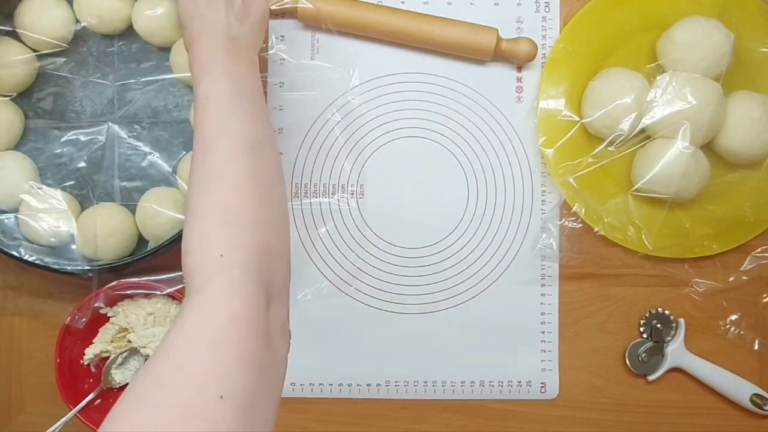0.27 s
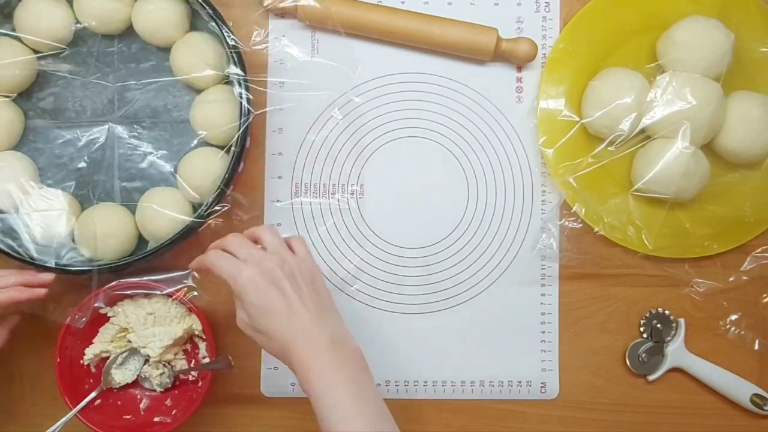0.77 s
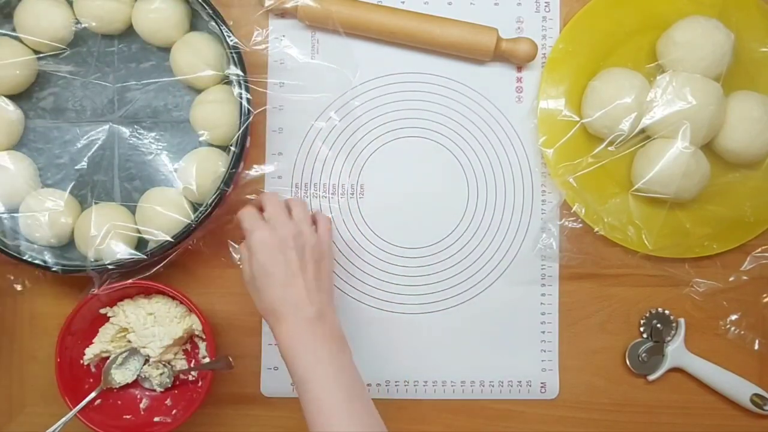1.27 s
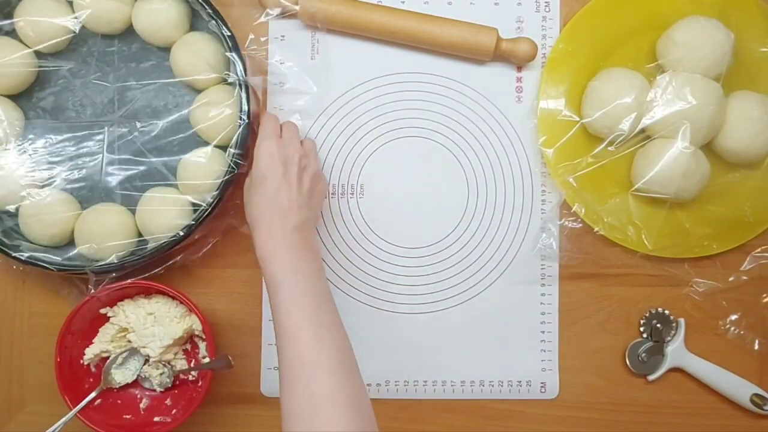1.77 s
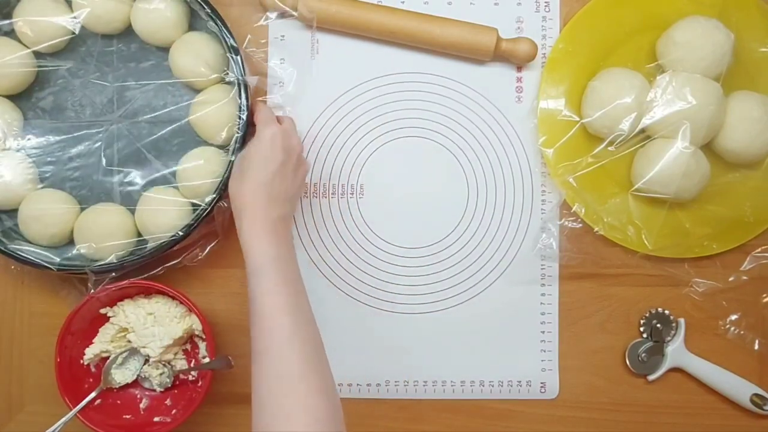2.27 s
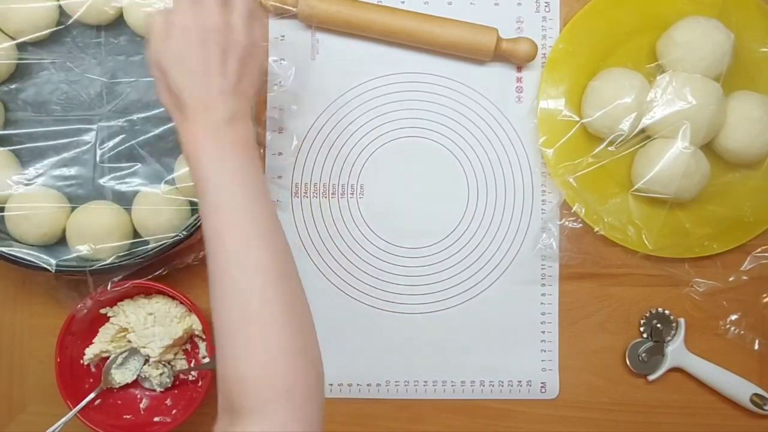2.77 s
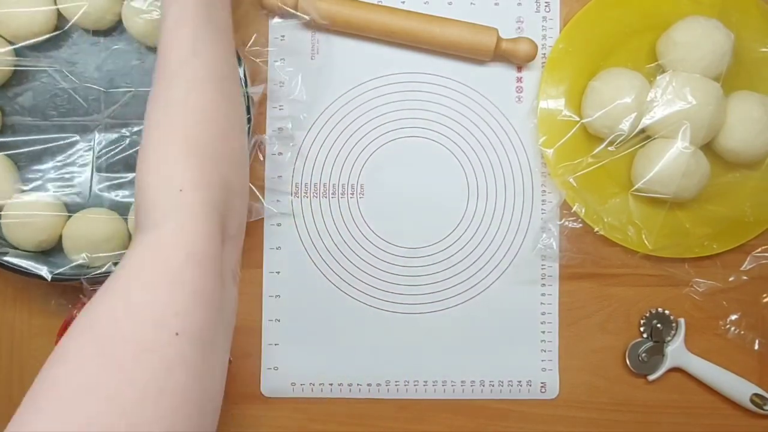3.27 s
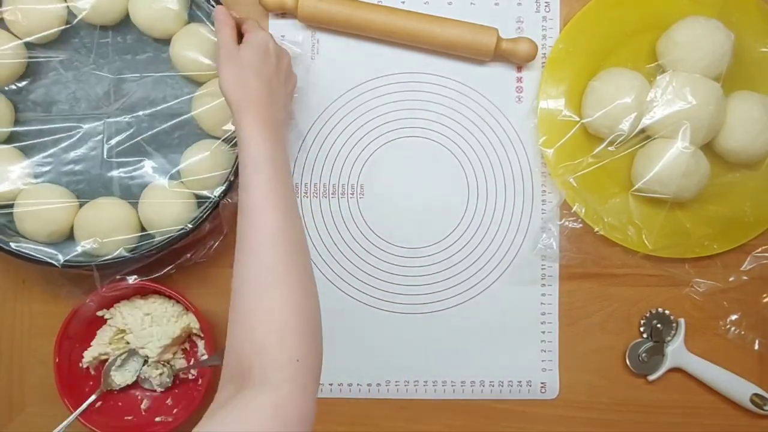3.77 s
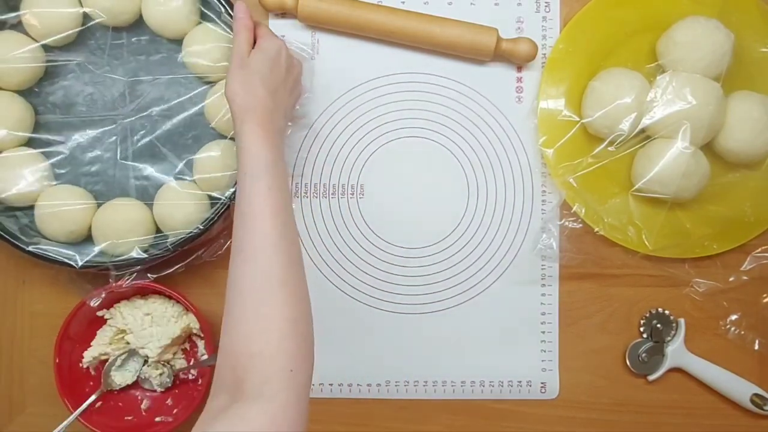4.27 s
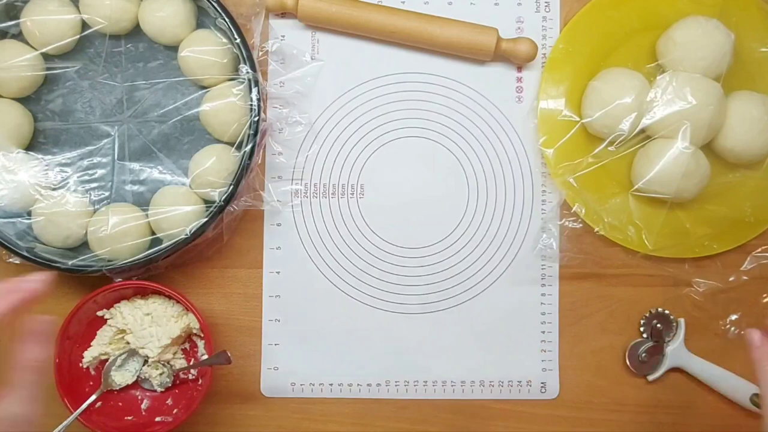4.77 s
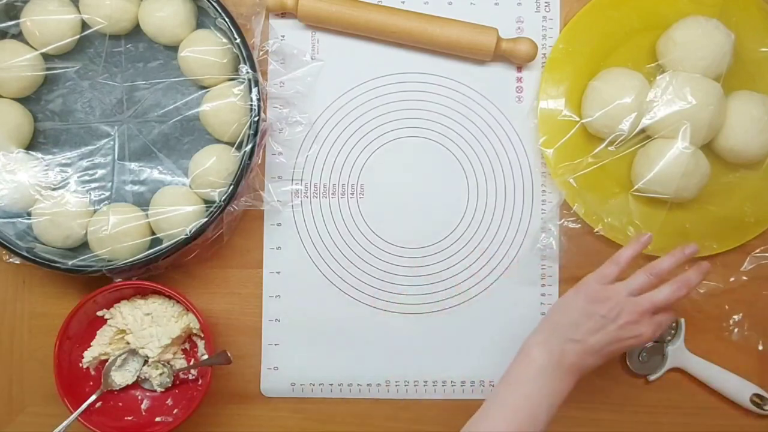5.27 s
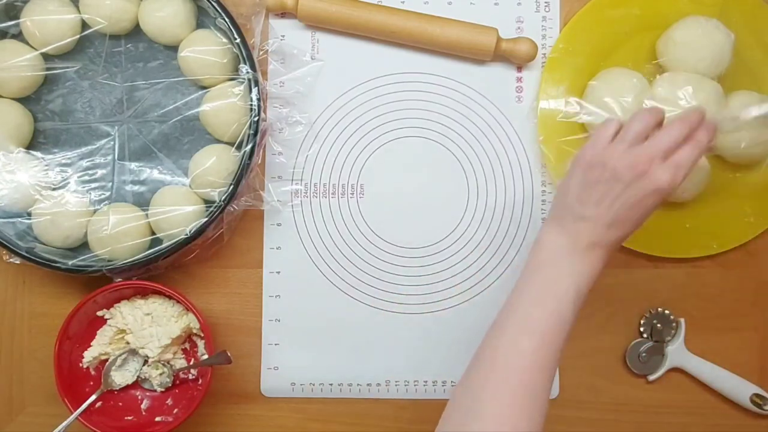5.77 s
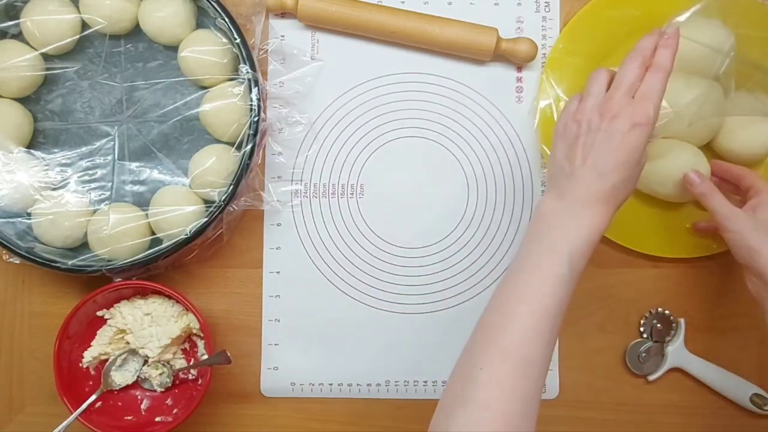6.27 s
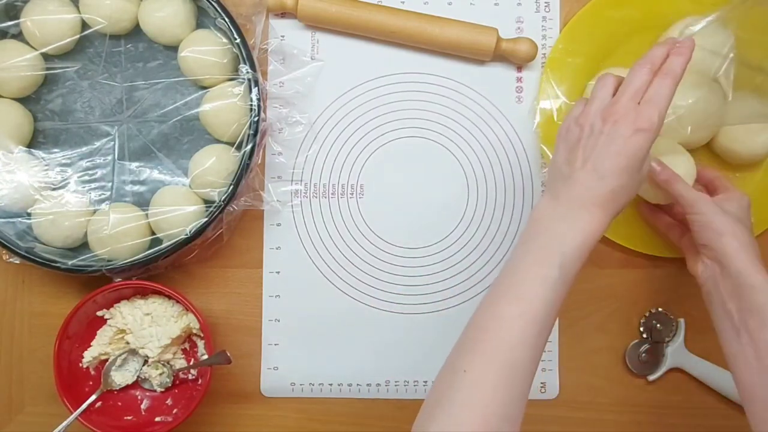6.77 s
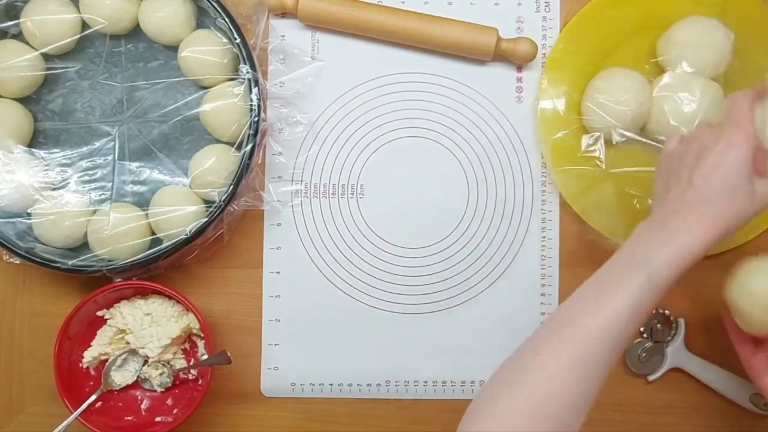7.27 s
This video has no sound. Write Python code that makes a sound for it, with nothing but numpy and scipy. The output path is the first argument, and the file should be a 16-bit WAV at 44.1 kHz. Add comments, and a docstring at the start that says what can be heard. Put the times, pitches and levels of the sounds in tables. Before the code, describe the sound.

Dry, crisp plastic crinkling comes in short bursts close to the microphone, slightly left, with sliding fingers and dull metallic thumps from a pan on a wooden table. The knocks peak midway, then the crackling thins and drops out for an instant. Muffled bumps sound farther off. A second, lighter bout of crackling follows toward the right, fading to quiet handling of soft dough and a final snap of film. Short kitchen reverberation, faint hiss.

```python
"""Cling film over a baking pan and a bowl

Cling film is pulled and pressed over a metal pan on a kitchen table, then lifted off dough on the right.
Buckling creases give showers of clicks; stick-slip rubbing drives a taut film and the pan or bowl below.
Knocks ring the modes of pan and table, dough lands in soft thuds and fingers squeak as narrow-band noise.
Far bumps arrive as decaying room noise over faint steady rumble and hiss; early scatter and a diffuse
tail follow the film.
"""
import sys
import numpy as np
from scipy import signal
from scipy.fft import rfft, irfft, next_fast_len
from scipy.io import wavfile
from scipy.ndimage import map_coordinates

SR = 44100
rng = np.random.default_rng(int(sys.argv[2]) if len(sys.argv) > 2 else 0)


def master(y):
    """Save y as 16-bit WAV."""
    cut = np.clip(np.atleast_2d(y).T, -1, 1)
    pcm = np.round(cut * 32767)  # scale
    wavfile.write(sys.argv[1], SR, pcm.astype(np.int16))


N = 332514  # length [samples]
BOWL_FROM_S = 5  # the hands work at the pan before this time, at the bowl after it


# Tugs at the film: (start [s], rise [s], hold [s], relative crinkle level [dB],
# slack folds relative to the crinkle [dB])
TUG_ROWS = [(0.053, .075, 0.08, -44, -17), (0.24, .025, 0.017, -45.5, -13), (0.312, .06, 0.099, -52, -19),
            (0.621, 0.013, 0.072, -55, -24), (1.054, .012, 0.087, -55, -10.5),
            (1.135, 0.046, 0.0095, -47, -14), (1.242, .01, 0.053, -47, -14), (1.311, 0.055, 0.14, -52, -11),
            (1.443, .01, 0.016, -49, -2), (1.694, 0.067, .05, -55, -5), (1.795, .05, .02, -45, -4),
            (1.879, .03, 0.095, -49, -14), (1.999, 0.049, 0.018, -43, -15), (2.108, 0.035, 0.042, -47, -15),
            (2.21, .04, 0.085, -51, -15), (2.355, .02, 0.072, -50, -7), (2.451, 0.075, 0.15, -53, -11),
            (2.659, 0.083, 0.075, -43, -9.5), (2.831, .03, 0.098, -52, -14),
            (3.033, 0.021, 0.041, -57, -9.5), (3.133, .03, .06, -67, -14.5), (3.202, .07, .08, -50, -9),
            (3.354, .015, 0.23, -45.5, -7.5), (3.602, 0.027, 0.24, -53.5, -12),
            (3.776, .06, 0.075, -51, -12), (3.944, .01, 0.027, -44.5, -20.5),
            (4.012, .01, 0.043, -42.5, -14), (4.131, 0.032, 0.23, -56, -13.5),
            (4.408, .012, .07, -58, -15.5), (4.519, .02, .15, -63, -13.5),
            (4.674, 0.019, 0.0098, -58.5, -16), (5.03, .14, 0.19, -69, -13),
            (5.351, 0.022, 0.053, -51, -12), (5.48, 0.0092, 0.012, -49, -12),
            (5.622, .035, .04, -47, -10.5), (5.766, 0.026, 0.094, -48, -8.5),
            (5.881, 0.019, 0.034, -45.5, -11), (5.93, .02, 0.038, -52, -10),
            (5.994, .012, .065, -43.5, -12), (6.117, .008, 0.04, -46.5, -12),
            (6.208, .008, 0.0096, -53.5, -12.5), (6.318, 0.0049, 0.013, -58, -21.5),
            (6.455, .01, 0.45, -68, -24), (7.004, .12, 0.068, -70.5, -21), (7.188, .025, 0.2, -58.5, -17),
            (7.423, 0.0088, 0.063, -56, -13), (7.518, 0.0051, 0.048, -48, -19.5)]
TUG_SAG_DB_PER_S, TUG_RELEASE_DB_PER_S = 16, 250  # the film gives while held, then falls quiet
SETTLE_DB, SETTLE_DB_PER_S = -25, 43  # loosened creases go on settling after each tug
# Single creases snapping over: (time [s], relative peak level [dB])
SNAP_EVENTS = [(0.0623, -41), (0.1421, -29), (0.165, -22), (0.5457, -42), (0.597, -41), (0.6185, -32),
               (0.6504, -37), (0.7098, -41), (0.9931, -56), (1.0605, -41), (1.1523, -31), (1.1792, -29),
               (1.2481, -33), (1.3778, -30), (1.4277, -35), (1.4556, -32), (1.498, -37), (1.6062, -50),
               (1.9634, -27), (2.0524, -30), (2.1535, -32), (2.2024, -32), (2.2747, -30), (2.3191, -33),
               (2.58, -32), (3.2804, -34), (3.3682, -31), (3.4895, -31), (3.7284, -37), (3.9534, -30),
               (4.0203, -33), (4.0637, -30), (4.3116, -33), (4.4754, -42), (4.5346, -42), (4.56, -42),
               (5.3677, -35), (5.4061, -32), (5.4919, -35), (5.6565, -33), (5.8486, -32), (5.9044, -28),
               (5.9164, -28), (6.0122, -27), (6.0444, -30), (6.1215, -31), (6.1958, -38), (6.2148, -34),
               (6.3245, -41), (6.3514, -43), (6.4592, -46), (6.4867, -42), (6.6174, -50), (7.1921, -45),
               (7.3287, -43), (7.43, -39), (7.5218, -28), (7.5304, -33)]
# A snap briefly stirs up the crinkle around it
FLURRY_DB, FLURRY_RISE_S, FLURRY_HOLD_S, FLURRY_DB_PER_S = 5, .001, .004, 700.5
# Spectrum of small creases: (frequency [Hz], relative level [dB])
FILM_SPECTRUM = [(200, -24.5), (700, -14), (1600, -8.5), (2800, -9), (4200, -1), (5500, -2.5), (8400, -3),
                 (11300, 2), (14000, -1.5), (15800, -6.5)]
# Spectrum of wide slack folds: (frequency [Hz], relative level [dB])
FOLD_SPECTRUM = [(300, -6), (1000, -11), (1700, -3), (2800, -2), (4500, -8.5), (9000, -16)]
# Spectrum of single loud snaps: (frequency [Hz], relative level [dB])
SNAP_SPECTRUM = [(500, -22), (2000, -17.5), (4000, -10.5), (7000, -4), (11500, 1), (15800, -5)]


def film():
    """Buckling instability: tugs release showers of creases, peeling sizzle, slack folds and loud snaps."""
    tugs = gestures(TUG_ROWS, TUG_SAG_DB_PER_S, TUG_RELEASE_DB_PER_S, SETTLE_DB, SETTLE_DB_PER_S)
    tug_db, fold_db = np.transpose(TUG_ROWS)[3:]
    snap_s, peak_db = np.transpose(SNAP_EVENTS)
    flurry_rows = [(start, FLURRY_RISE_S, FLURRY_HOLD_S) for start in snap_s]
    flurries = gestures(flurry_rows, 0, FLURRY_DB_PER_S)
    level_db = summed_db(tugs, tug_db) + FLURRY_DB * per_sample(flurries.max(0))
    slack_db = blended(tugs, fold_db)

    crackle_db = level_db - 6.0 + 2 * wobble(45)
    crackle = shower(crackle_db, FILM_SPECTRUM, rate=260, crowding=.5, spread_db=3.0, life=0.00017)
    # fine sizzle where film peels from film
    sizzle_db = level_db - 8.5 + 1.5 * wobble(30)
    sizzle = shower(sizzle_db, FILM_SPECTRUM, rate=3000, crowding=.4, spread_db=-3.0, life=0.00015)
    folds_db = level_db + slack_db - 3.5
    folds = shower(folds_db, FOLD_SPECTRUM, rate=700, crowding=.4, spread_db=4.5, life=0.0003)
    showers = crackle + sizzle + folds

    # a crease gives way in a quick run of ever smaller jumps
    jumps = np.arange(3)
    first = np.clip(np.round(snap_s * SR).astype(int), 0, N - 1)
    delays = jumps * rng.uniform(25, 70, (len(snap_s), 1))  # samples
    at = np.minimum(first[:, None] + delays.astype(int), N - 1)
    sizes = amp(peak_db[:, None] + 12.5 - 2.5 * jumps)
    bursts = clicks(at.ravel(), sizes.ravel(), life=.00045, scatter_db=1)
    snaps = coloured(bursts, SNAP_SPECTRUM)

    # the loud snaps are drier and stand out close
    to_room = showers + amp(-11.0) * snaps
    answer = in_kitchen(to_room, near_db=2.0, near_t60=0.054, room_db=-3)
    return placed(showers + snaps + answer)


def shower(level_db, spectrum, rate, crowding, spread_db, life):
    """Random point process: harder work makes creases more frequent and larger (rate per s at -50 dB)."""
    density = np.clip(rate * amp(crowding * (level_db + 50)), 80, 6000)
    at = np.flatnonzero(rng.random(N) < density / SR)
    spread = np.minimum(rng.standard_normal(len(at)), 1.7)  # one tail is capped
    sizes = amp(spread_db * spread) / np.sqrt(density[at])
    grains = unit(coloured(clicks(at, sizes, life, scatter_db=4), spectrum))
    return amp(level_db) * grains


PAN_LEAD, BOWL_LEAD = 5, -11  # mean samples by which the left microphone hears the film first


def clicks(at, sizes, life, scatter_db, size=128):
    """Impulsive radiation: each crease is a decaying noise burst with time and level differences by side."""
    t = np.arange(size) / SR
    draw = rng.standard_normal((len(at), size + 3))
    lives = life * np.exp(draw[:, :1] / 4)
    lean_db = scatter_db * draw[:, 1:2]
    burst = draw[:, 3:] * np.exp(-t / lives)
    burst *= sizes[:, None] / np.linalg.norm(burst, axis=1, keepdims=True)
    mean_lead = np.where(at < BOWL_FROM_S * SR, PAN_LEAD, BOWL_LEAD)
    lead = (mean_lead + 2 * draw[:, 2]) / 2  # samples on each side
    ears = []
    for side in (1, -1):  # left, right
        onset = np.round(at - side * lead).astype(int)
        index = np.maximum(onset[:, None] + np.arange(size), 0)
        heard = burst * amp(side * lean_db / 2)
        ears.append(np.bincount(index.ravel(), heard.ravel(), N)[:N])
    return np.array(ears)


# Fingers sliding over the film: (start [s], rise [s], hold [s], relative rubbing level [dB],
# relative shaking level of pan or bowl [dB], pitch of the taut film [Hz],
# relative drumming level against the rubbing [dB])
STROKE_ROWS = [(0.066, 0.028, 0.2, -49, -52.5, 1045, 2.5), (0.373, 0.016, 0.044, -53.5, -60.5, 949.8, -3),
               (0.636, 0.063, 0.0077, -71, -71, 1002, 6), (1.053, .01, 0.14, -50.5, -59, 1125, -2),
               (1.22, 0.033, 0.026, -51.5, -51.5, 1134, -1),
               (1.379, 0.061, 0.087, -65.5, -66.5, 1209, -5.5), (1.737, 0.031, .11, -52.5, -49, 1350, -16),
               (1.903, 0.11, 0.091, -54, -51, 1348, -19), (2.128, 0.021, 0.18, -58, -62.5, 1350, -4),
               (2.349, 0.019, 0.051, -51, -52.5, 1348, -5.5), (2.503, 0.04, 0.16, -60.5, -67.5, 1317, -6),
               (2.668, 0.1, .015, -47, -51.5, 1300, -8), (2.839, 0.031, .25, -60, -58, 657, -7),
               (3.221, 0.026, .11, -51, -57.5, 719.4, -2), (3.385, 0.11, 0.094, -62.5, -50.5, 900, 3),
               (3.612, 0.049, 0.15, -58.5, -52.5, 1010, 1.5), (3.92, 0.028, 0.022, -51, -47, 755, -7),
               (4.013, .025, 0.045, -50.5, -49, 757.4, -11), (4.108, 0.029, .2, -55, -57.5, 741.3, -21),
               (4.388, 0.043, 0.17, -64.5, -60.5, 736.3, -14), (4.67, .03, .015, -70, -61, 715, -8),
               (5.356, .02, .05, -66, -65, 706, 0), (5.449, 0.04, 0.016, -61, -62, 703, -2),
               (5.613, .06, .02, -56.5, -50, 938, -6), (5.77, .12, 0.035, -53.5, -53.5, 1120, -2),
               (5.986, .025, 0.15, -51.5, -52, 1293, -26), (6.451, 0.028, 0.052, -85, -76, 1290, -15),
               (7.15, 0.22, .14, -72, -75, 1284, -20)]
STROKE_SAG_DB_PER_S, STROKE_RELEASE_DB_PER_S = 22, 150  # the fingers ease off, then lift
# Spectrum of fingers on film: (frequency [Hz], relative level [dB])
SLIDE_SPECTRUM = [(150, -19.5), (330, -0.5), (500, -5), (680, -4), (1000, -3), (1350, -2.5), (1800, -7.5),
                  (3000, -10), (6000, -14.5)]
# Spectrum of the shaken bowl: (frequency [Hz], relative level [dB])
BOWL_SPECTRUM = [(50, -17), (100, -11.5), (160, 3.5), (220, -10), (330, 4), (500, -7), (700, -2.5),
                 (1200, -27)]
# Spectrum of dull contact, for the shaken table and for knocks: (frequency [Hz], relative level [dB])
THUD_SPECTRUM = [(30, -30), (80, -17.5), (200, -12), (400, -1), (600, -15.5), (1200, -12), (2000, -14),
                 (4000, -23)]


def rubbing():
    """Stick-slip friction: random slips drum on the taut film and shake first the pan, later the bowl."""
    strokes = gestures(STROKE_ROWS, STROKE_SAG_DB_PER_S, STROKE_RELEASE_DB_PER_S)
    rub, shake, pitch, drum = np.transpose(STROKE_ROWS)[3:]
    rub_db = summed_db(strokes, rub) + 4.2 * wobble(25)
    shake_db = summed_db(strokes, shake)
    taut_hz, taut_db = blended(strokes, pitch), blended(strokes, drum)

    scrape = amp(-1.5) * unit(diffuse(coloured(slips(rate=3000), SLIDE_SPECTRUM)))
    drumming = amp(taut_db - 3.5) * drone(taut_hz, width_hz=363)
    pan = amp(0.5) * unit(diffuse(filtered(slips(rate=500), pan_response)))
    dull_slips = softened(coloured(slips(rate=400), THUD_SPECTRUM), cut_hz=433)
    table = amp(-8.0) * unit(diffuse(dull_slips))
    bowl = amp(-3.0) * unit(diffuse(coloured(slips(rate=900), BOWL_SPECTRUM)))

    at_pan = np.arange(N) / SR < BOWL_FROM_S
    shaken = np.where(at_pan, pan + table, bowl)
    return placed((scrape + drumming) * amp(rub_db)) + shaken * amp(shake_db)


def slips(rate):
    """Random impulse train: independent slips on each side, rate per second."""
    return rng.standard_normal((2, N)) * (rng.random((2, N)) < rate / SR)


# Modes of the table with the pan on it: (frequency [Hz], relative level [dB], t60 [s])
PAN_MODES = [(85.6, 0, 0.32), (115.87, -0.5, 0.32), (157.9, 1.5, 0.34), (265.2, -2, 0.35), (327.1, 3, 0.26),
             (436, -4, 0.14), (454, 0.5, 0.19), (580, -11.5, 0.33), (633, -5.5, 0.28), (693.4, -1.5, 0.21),
             (865, -24.5, 0.2), (911, -6, 0.24), (1020, -16, 0.67), (1210, -10, 0.24), (1490, -14.5, 0.16),
             (1675, -12.5, 0.24), (1986, -14, 0.27), (2590, -9, 0.2)]


def pan_response(hz):
    """Modal superposition: damped resonances of the pan on the table, with alternating signs."""
    total = 0
    for k, (f, db, t60) in enumerate(PAN_MODES):
        detuning = (f * f - hz * hz) * t60 * np.pi / np.log(1000)
        mode = amp(db) * t60 * 1j * hz / (detuning + 1j * hz * 2)
        total = total + mode * (-1) ** k
    return total


# Knocks of hands, pan and dough on the table: (time [s], relative level [dB], contact cut-off [Hz],
# relative boom level [dB], pitch of the struck spot [Hz])
KNOCK_EVENTS = [(1.059, -52.5, 401.5, 10.5, 340.9), (1.246, -44, 490, 0, 362), (1.455, -61, 4500, -8, 1500),
                (1.772, -31.5, 1413, 6, 318.4), (1.85, -36.5, 1994, -31, 337.5), (1.983, -47, 130, 11, 160),
                (2.358, -48, 2400, -9, 655), (2.383, -48, 407, -5, 332.9), (3.237, -51, 927.6, 8.5, 166.6),
                (3.363, -33.5, 4900, -5, 1490), (3.369, -29.5, 2783, 4.5, 391.3),
                (3.471, -31.5, 830, 6.5, 182.4), (3.488, -43, 3600, 10.5, 1730),
                (3.824, -22.5, 1480, 1.5, 420.6), (4.219, -27.5, 534.4, 5, 270.2),
                (6.655, -58, 245.8, 5.5, 146), (6.826, -49.5, 203.2, 3.5, 121.2),
                (7.19, -53.5, 303, 4, 162), (7.225, -57, 357.7, 6.5, 259.2)]


def knocks(swell=0.016):
    """Modal excitation by impact: the struck spot clunks, modes ring on and the table's boom builds slowly."""
    out, t = np.zeros((2, N)), np.arange(SR // 2) / SR
    hz, mode_db, t60 = np.transpose(PAN_MODES)[:, :, None]
    booms = hz < 200
    rise = np.where(booms, 1 - np.exp(-(t / swell) ** 2), 1 - np.exp(-t * hz))
    # the blow itself and its echo in the room
    contact = amp(-60 * t / .06) + amp(-12 - 60 * t / .35)
    for s, db, cut_hz, boom_db, spot_hz in KNOCK_EVENTS:
        draw = rng.standard_normal((3, len(PAN_MODES), 1))
        strength = amp(mode_db + 3.2 * draw[0] + boom_db * booms - 60 * t / t60) * rise
        apart = np.arccos(np.clip(along(LIKENESS, hz), -1, 1)) * draw[1] / 2  # phase on each side
        phase = 2 * np.pi * hz * t + np.pi * draw[2]
        ring = np.array([(strength * np.sin(phase + side * apart)).sum(0) for side in (1, -1)])
        clunk = amp(-3.0 - 60 * t / 0.1) * np.sin(2 * np.pi * spot_hz * t)
        noise = rng.standard_normal((2, len(t))) * contact
        thud = diffuse(coloured(noise, THUD_SPECTRUM))
        thud *= amp(-2.5) / np.std(thud[:, :SR // 100])  # level of the first 10 ms
        add(out, s, amp(db) * softened(amp(-11.5) * ring + clunk + thud, cut_hz))
    return out


# Fingers squeaking on the film over the dough: (time [s], relative level [dB], pitch [Hz])
SQUEAK_EVENTS = [(6.526, -69, 1800), (6.812, -77, 1200), (7.17, -71, 1538)]


def squeaks(rise=0.0096):
    """Narrow-band friction noise: each squeak swells quickly and fades."""
    out = np.zeros((2, N))
    for s, db, hz in SQUEAK_EVENTS:
        u = np.maximum(np.arange(N) / SR - s, 0) / rise
        swell = u * np.exp(1 - u)
        out += amp(db) * swell * drone(hz, width_hz=530)
    return out


# Dull bumps farther off in the room: (time [s], relative level [dB], contact cut-off [Hz])
BUMP_EVENTS = [(4.959, -45.5, 484), (5.031, -40.5, 347.5), (5.055, -36, 444), (5.069, -42, 2590),
               (5.085, -44.5, 2814), (5.11, -48, 2567)]
# Spectrum of the bumps: (frequency [Hz], relative level [dB])
FAR_SPECTRUM = [(50, -30), (150, -14.5), (290, -7), (450, -17), (700, -10), (1200, -16.5), (2700, -22.5),
                (4000, -26.5)]


def bumps():
    """Reverberant field beyond the critical distance: bumps arrive almost wholly by way of the room."""
    out = np.zeros((2, N))
    for s, db, cut_hz in BUMP_EVENTS:
        tail = room_tail()
        t = np.arange(tail.shape[1]) / SR
        bump = coloured(tail * (1 + 0.5 * amp(-60 * t / 0.035)), FAR_SPECTRUM)
        add(out, s, amp(db + 5.5) * softened(bump / np.abs(bump).max(), cut_hz))
    return out


# Spectrum of the background: (frequency [Hz], relative level [dB])
QUIET_SPECTRUM = [(18, -54.5), (30, -23.5), (161, -0.5), (227, -16), (266, -4), (384, -11), (449, -13.5),
                  (499, -13), (721, -23.5), (2610, -26), (3400, -30), (11700, -21), (16000, -19.5)]


def room_tone():
    """Stationary diffuse noise: faint steady rumble and hiss."""
    noise = rng.standard_normal((2, N))
    return amp(-70.5) * unit(diffuse(coloured(noise, QUIET_SPECTRUM)))


def in_kitchen(x, near_db, near_t60, room_db, size=8192):
    """Early and late reflections: early scatter off table and dishes, then the diffuse room tail."""
    # drawn afresh in fixed blocks so that no single colour rings through
    out, t = np.zeros((2, N)), np.arange(SR // 10) / SR
    for start in range(0, N, size):
        near = rng.standard_normal((2, len(t))) * amp(-60 * t / near_t60)
        answer = amp(room_db) * room_tail()
        add(answer, .001, amp(near_db) * near / np.linalg.norm(near[0]))
        add(out, start / SR, signal.fftconvolve(x[:, start:start + size], answer, axes=1))
    return out


# Decay of the kitchen: (frequency [Hz], t60 [s])
ROOM_DECAY = [(100, 0.52), (500, 0.39), (2000, 0.34), (6000, 0.38), (15000, 0.19)]


def room_tail():
    """Exponential reverberant decay: diffuse noise dying at each band's rate, left energy scaled to 1."""
    hz, t, z = signal.stft(rng.standard_normal((2, SR // 2)), SR, nperseg=256)
    decay = amp(-60 * t / along(ROOM_DECAY, hz)[:, None])
    tail = diffuse(signal.istft(z * decay, SR, nperseg=256)[1])
    return tail / np.linalg.norm(tail[0])


# Left-right likeness of diffuse sound: (frequency [Hz], correlation [1])
LIKENESS = [(60, 0.89), (150, 0.94), (280, 0.79), (550, 0.53), (1100, 0), (16000, 0.0061)]


def diffuse(pair):
    """Spatial coherence: two unrelated signals become alike in the bass and unrelated in the treble."""
    def mixing(hz):
        turn = np.arccos(np.clip(along(LIKENESS, hz), -1, 1)) / 2
        return np.array([np.cos(turn), np.sin(turn)])

    mid, side = filtered(pair, mixing)
    return np.array([mid + side, mid - side])


# Where the hands are: (time [s], left minus right [dB])
HAND_PLACE = [(0, 1.5), (.65, 1.5), (1.2, 1.5), (2, 1.5), (2.8, 2), (3.9, 0), (4.5, 3.5), (5.4, 0.5),
              (5.9, -2.5), (6.4, -1), (7.54, -1)]


def placed(x):
    """Interaural level difference: follow the hands from side to side."""
    lean, = curves(HAND_PLACE)
    return x * amp(np.array([lean, -lean]) / 2)


def gestures(rows, sag_db_per_s, release_db_per_s, settle_db=-120, settle_db_per_s=0, count=7540):
    """Exponential envelopes: each coarse row rises, sags while held and is released, perhaps to a tail."""
    start, rise, hold = np.transpose(rows)[:3, :, None]
    t = np.linspace(0, N / SR, count) - start
    after = np.maximum(t - rise - hold, 0)
    tail = amp(settle_db - settle_db_per_s * after)
    release = np.maximum(amp(-release_db_per_s * after), tail)
    sag = amp(-sag_db_per_s * np.clip(t - rise, 0, hold))
    return np.clip(t / rise, 0, 1) * sag * release


def per_sample(coarse):
    """Linear interpolation: stretch a coarse control over all samples."""
    return np.interp(np.arange(N), np.linspace(0, N, len(coarse)), coarse)


def summed_db(envelopes, db):
    """Energy summation: level of all gestures together, each at its own strength."""
    return per_sample(10 * np.log10(amp(db) ** 2 @ envelopes ** 2 + 1e-12))


def blended(envelopes, values):
    """Energy weighting: a property passes from one gesture to the next."""
    weights = envelopes ** 2 + 1e-12
    return per_sample(values @ weights / weights.sum(0))


def drone(hz, width_hz):
    """Quadrature modulation: stereo narrow-band noise of rms 1 around a pitch that may move."""
    a, b = softened(rng.standard_normal((2, 2, N)), width_hz / 2)
    phase = 2 * np.pi * np.cumsum(hz * np.ones(N)) / SR
    return unit(a * np.cos(phase) + b * np.sin(phase))


def softened(x, cut_hz):
    """Contact low-pass: a soft contact passes little far above its cut-off."""
    return signal.sosfilt(signal.butter(4, min(cut_hz, SR / 3), fs=SR, output="sos"), x)


def coloured(x, spectrum, size=4096):
    """Minimum-phase filtering: a causal filter of the given spectrum keeps attacks sharp."""
    gain = amp(along(spectrum, np.fft.rfftfreq(size, 1 / SR)))
    cepstrum = irfft(np.log(gain))
    # fold the cepstrum onto positive time
    cepstrum[1:size // 2] *= 2
    cepstrum[size // 2 + 1:] = 0
    impulse = irfft(np.exp(rfft(cepstrum)))
    return signal.oaconvolve(x, impulse[None], axes=1)[:, :x.shape[1]]


def filtered(x, response):
    """Linear filtering: multiply the spectrum of x by a response of frequency."""
    n = x.shape[-1]
    m = next_fast_len(n + SR // 2)
    return irfft(rfft(x, m) * response(np.fft.rfftfreq(m, 1 / SR)), m)[..., :n]


def wobble(rate):
    """Band-limited fluctuation: a smooth random curve, rate knots a second."""
    knots = rng.standard_normal(int(N * rate / SR) + 4)
    return map_coordinates(knots, [np.arange(N) * rate / SR])


def curves(rows):
    """Linear interpolation: one value per sample for each column after the time."""
    s, *cols = np.transpose(rows)
    return [np.interp(np.arange(N) / SR, s, c) for c in cols]


def along(points, hz):
    """Logarithmic frequency scale: interpolate (frequency [Hz], value) points."""
    f, v = np.transpose(points)
    return np.interp(np.log(hz + 1), np.log(f + 1), v)


def amp(db):
    """Level definition: decibels to amplitude gain."""
    return 10 ** (np.asarray(db) / 20)


def unit(x):
    """Root-mean-square normalization: scale to rms 1."""
    return x / np.sqrt(np.mean(x ** 2) + 1e-20)


def add(track, s, sound):
    """Linear superposition: mix a stereo sound in at time s."""
    part = track[:, max(round(s * SR), 0):][:, :sound.shape[1]]
    part += sound[:, :part.shape[1]]


def scene():
    """Superposition of everything heard from above the table."""
    return film() + rubbing() + squeaks() + knocks() + bumps() + room_tone()


# A brief, deep dip of the whole sound: (time [s], level [dB])
DIP = [(4.716, 0), (4.722, -24), (4.745, -50), (4.775, -50), (4.79, 0)]
TOP_HZ = 15820


def record(dry):
    """Gain modulation and band limiting: the level dips deeply for an instant; nothing passes above TOP_HZ."""
    dip_db, = curves(DIP)
    return filtered(dry * amp(dip_db), lambda hz: hz < TOP_HZ)


dry = scene()
out = record(dry)
master(out)
```